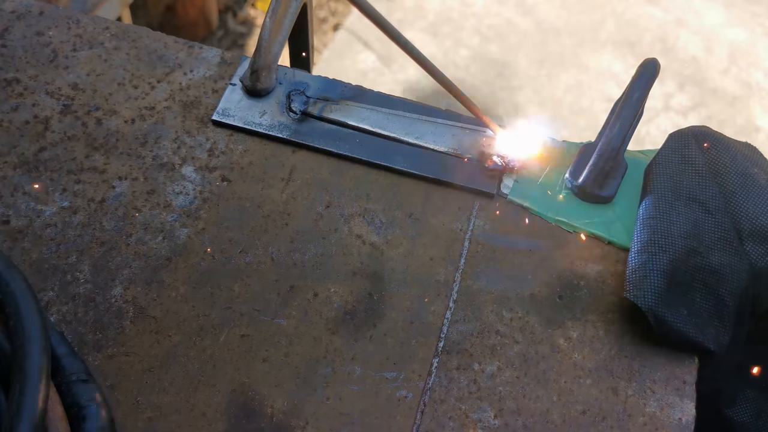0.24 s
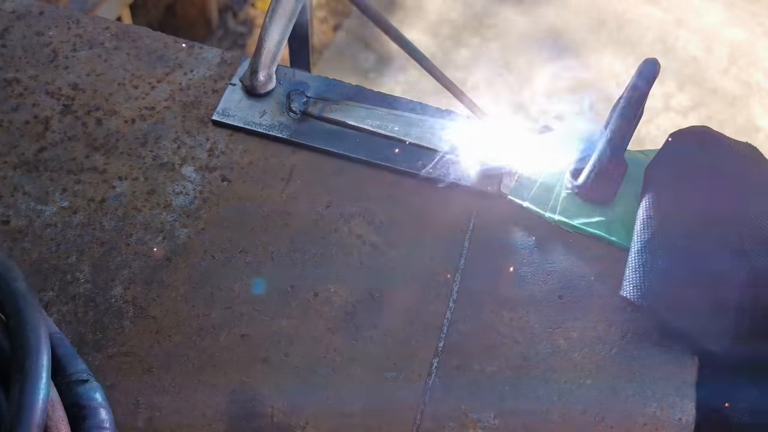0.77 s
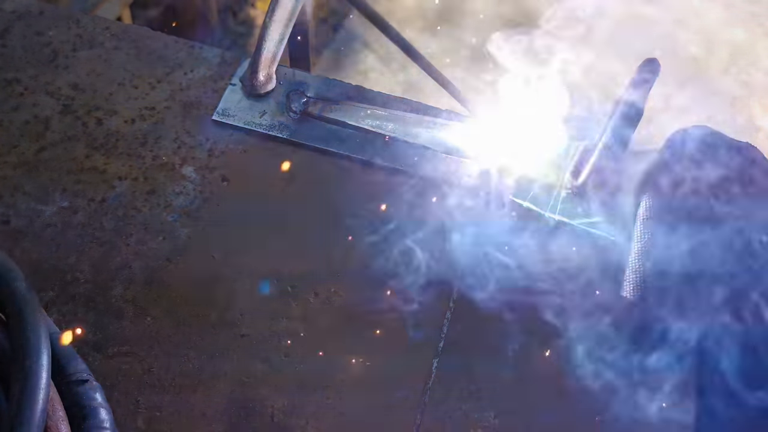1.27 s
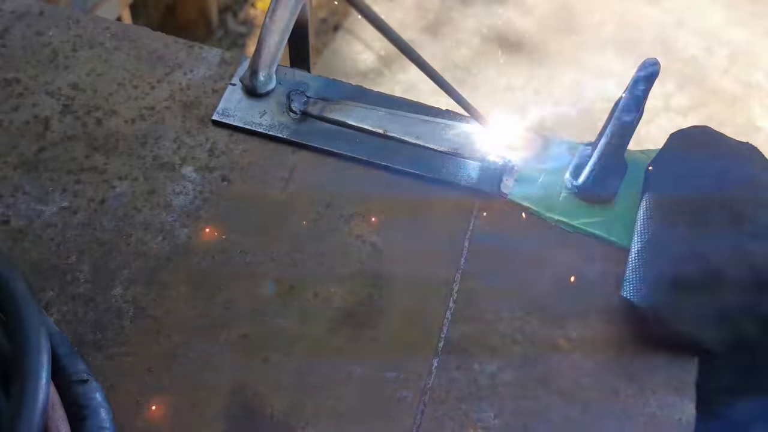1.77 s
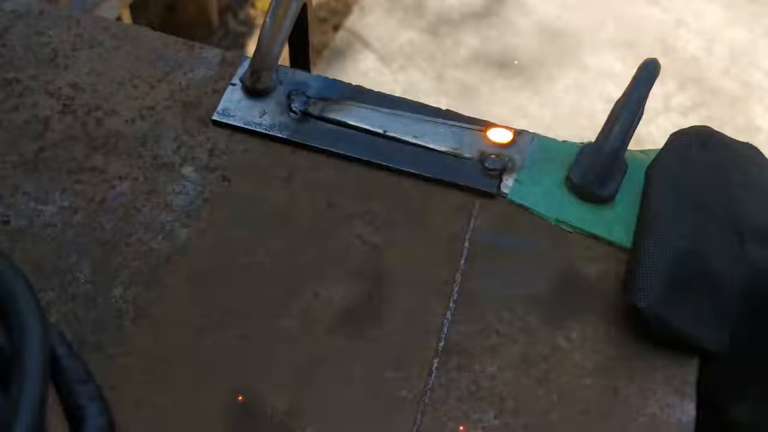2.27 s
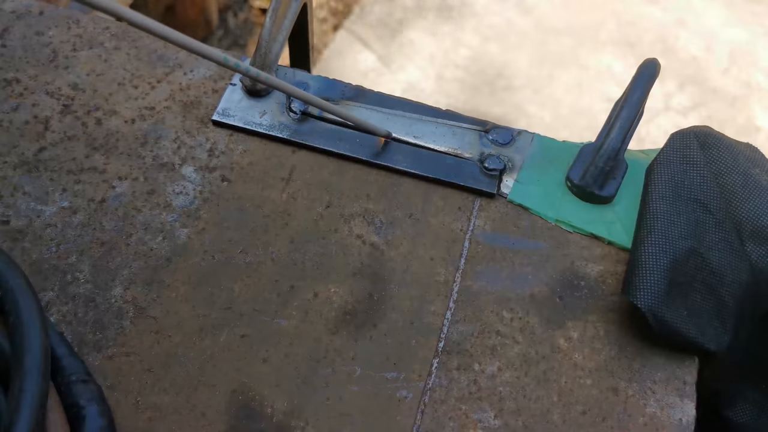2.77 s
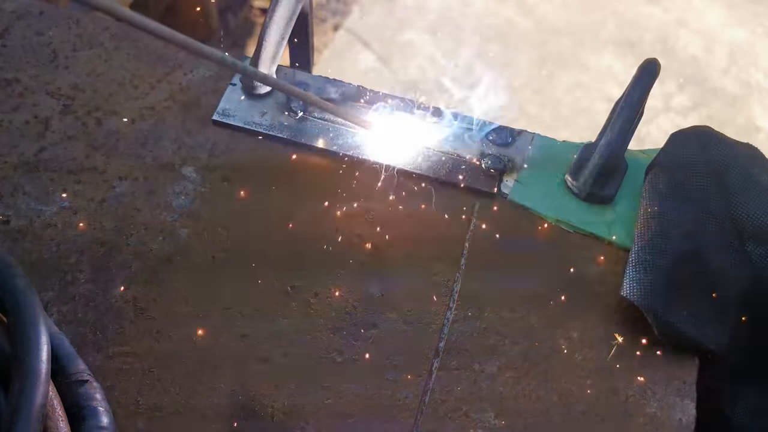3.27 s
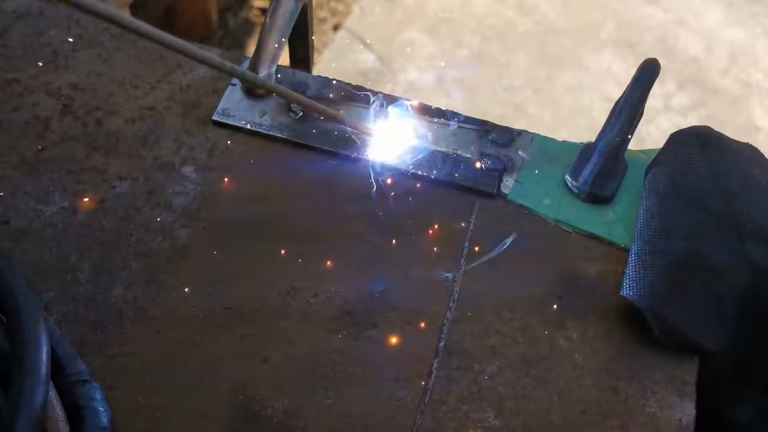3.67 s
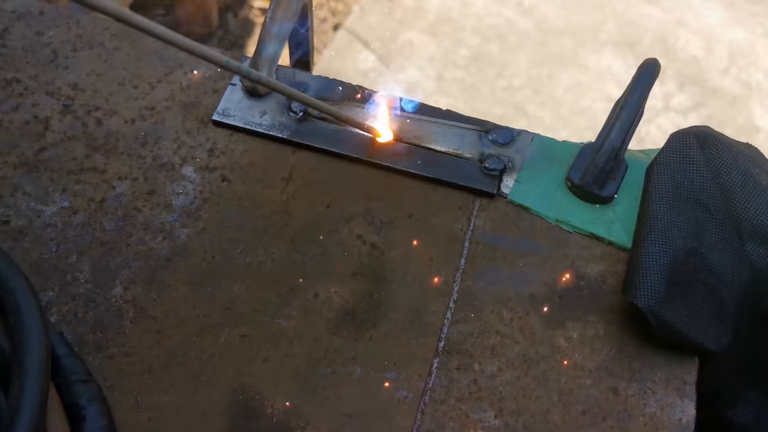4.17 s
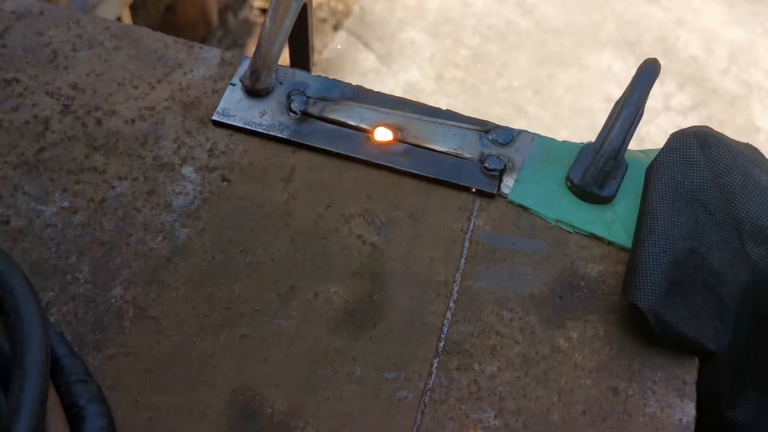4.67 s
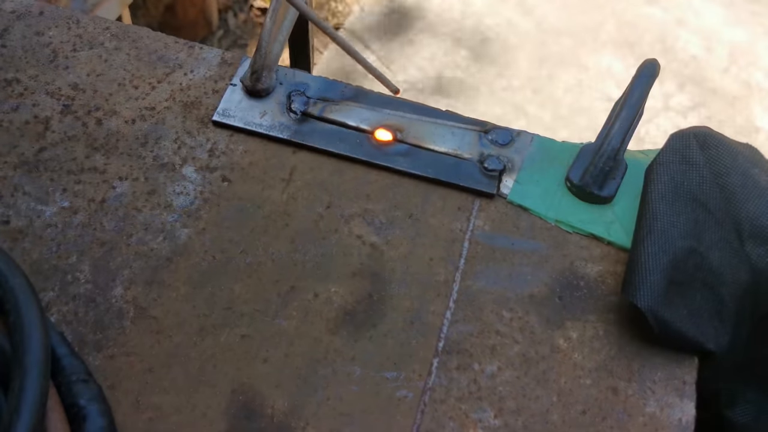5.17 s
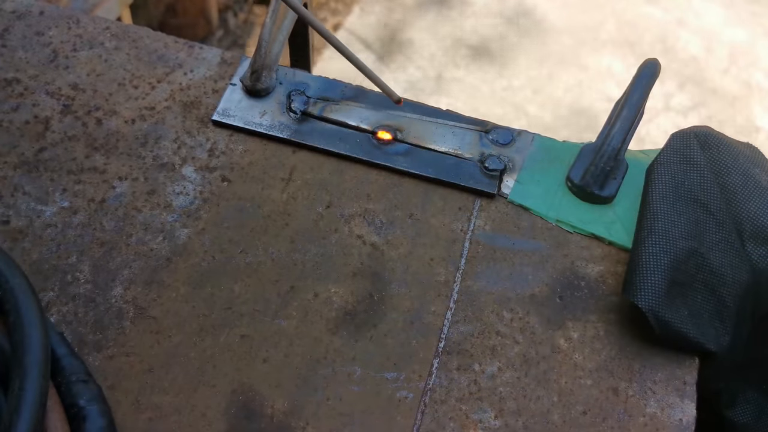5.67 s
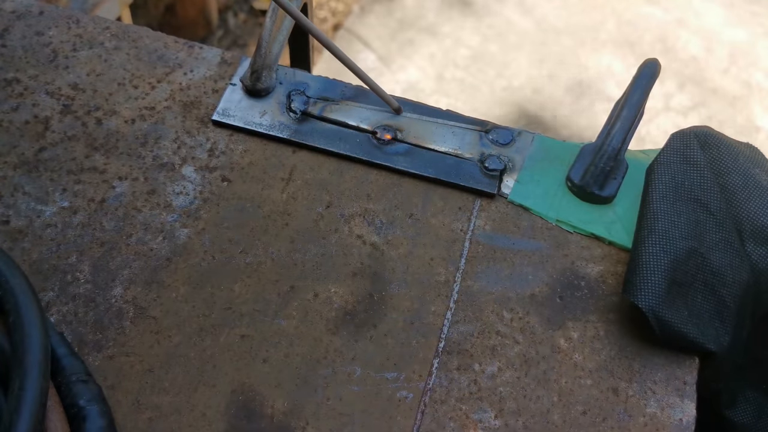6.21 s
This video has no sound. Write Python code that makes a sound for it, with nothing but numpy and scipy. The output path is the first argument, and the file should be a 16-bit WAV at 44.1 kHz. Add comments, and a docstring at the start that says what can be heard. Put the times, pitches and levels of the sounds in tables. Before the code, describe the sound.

Close stick welding hisses, crackles and pops in two bursts over a thin wavering fan whine, then stops, leaving fan and light wind buffeting.

```python
"""Two short stick welds on a clamped steel strip, heard close by: the arc hisses, sizzles and pops.
The arc is noise mixed with tiny bursts, cracks and a jet roar, all sent through shared resonances.
A brief fizz of the first bead and dull puffs of hot gas are shaped noise.
The welder's cooling fan whines throughout, made of wavering tones and a rush of noise; a far motor
drones as one low tone over a rumble. Late on, noise and bumps make air buffet the left microphone."""
import sys
import numpy as np
from scipy import signal
from scipy.fft import rfft, irfft, next_fast_len
from scipy.io import wavfile

SR = 44100
rng = np.random.default_rng(int(sys.argv[2]) if len(sys.argv) > 2 else 0)


def generate_wav(sig):
    """Save sig (samples, or channels by samples) to the path in sys.argv[1] as 16-bit PCM at SR."""
    pcm = np.round(np.clip(np.atleast_2d(sig).T, -1, 1) * 32767).astype(np.int16)
    wavfile.write(sys.argv[1], SR, pcm)


N = 284180
TIME = np.arange(N) / SR
SIZE = next_fast_len(N + SR // 4, real=True)   # room for echoes to die away
HZ = np.maximum(np.fft.rfftfreq(SIZE, 1 / SR), 1)
CUTOFF_HZ = 16000

# Table levels are starting points: the functions add small trims and waver.
# Colour tables give only the balance of pitches; balances are left minus right.

# Level of the far motor: time_s, level_db
MOTOR_LEVEL = [(0.0, -83), (1.3, -94), (1.7, -79), (2.45, -71), (2.7, -63), (2.95, -62.5), (3.25, -90),
               (3.92, -73), (4.35, -81), (4.68, -64), (5.2, -59.5), (5.46, -46.5), (5.6, -51.5),
               (5.75, -62), (5.93, -53), (6.05, -56), (6.17, -51), (6.28, -58), (6.44, -74)]
MOTOR_HZ = 90.6

# Gusts on the microphone: time_s, buffeting_db, length_s, flutter_over_buffeting_db
GUSTS = [(5.145, -56, 0.028, -5), (5.304, -52, 0.0091, -9), (5.374, -50, 0.02, -14),
         (5.675, -43, 0.0093, -7), (5.7, -41.5, 0.008, -7.5), (6.025, -52, 0.012, -12),
         (6.37, -42, 0.014, 3), (6.417, -41, 0.016, 1.5)]
# Single eddies that bump the microphone: time_s, peak_db, half_length_s
BUMPS = [(5.147, -46, 0.0023), (5.18, -44, 0.0025), (5.216, -41.5, .007), (5.286, -35, 0.0033),
         (6.02, -45, .004), (6.371, -32, 0.0026), (6.399, -30.5, 0.0028)]
# A light breeze between the gusts
BREEZE_FROM_S, BREEZE_RISE_S, BREEZE_DROP_DB_PER_S = 4.85, 0.22, 4.5
BREEZE_DB, BREEZE_FLUTTER_DB = -58, -13.5

# Loudness of the fan's blade tone: time_s, level_db
WHINE_LEVEL = [(0.0, -59.5), (0.33, -59), (0.41, -70), (0.47, -60.5), (0.53, -52.5), (0.6, -59),
               (0.73, -54.5), (0.87, -69.5), (0.97, -60), (1.03, -52), (1.1, -61), (1.2, -54), (1.39, -51),
               (1.46, -58), (1.52, -53), (1.6, -55), (1.79, -49.5), (1.84, -60), (1.88, -62), (1.95, -56),
               (2.09, -47.5), (2.24, -53), (2.29, -47.5), (2.355, -48), (2.39, -63), (2.5, -48),
               (2.62, -65), (2.76, -47), (2.9, -60), (3.1, -65.5), (3.19, -70.5), (3.5, -67), (3.8, -62.5),
               (3.87, -70.5), (4.02, -54), (4.12, -58), (4.18, -66), (4.3, -59), (4.37, -73), (4.45, -67),
               (4.71, -68), (4.78, -58.5), (4.87, -53), (4.9, -66), (4.93, -49.5), (5.0, -60), (5.09, -51),
               (5.24, -67), (5.33, -53), (5.41, -61), (5.52, -50.5), (5.62, -61), (5.7, -48), (5.87, -47),
               (5.95, -54.5), (6.03, -52), (6.09, -59.5), (6.2, -45), (6.29, -47), (6.37, -63), (6.43, -66)]
# Loudness of the fan's moving air: time_s, level_db
RUSH_LEVEL = [(0.0, -65.5), (1.0, -69), (1.6, -64.5), (2.1, -66.5), (2.3, -62.5), (2.96, -62.5),
              (3.0, -69.5), (3.18, -75), (4.6, -70), (5.0, -62.5), (5.17, -60), (5.28, -61), (6.44, -62)]
# Lesser rotor tones: multiple_of_turning_rate (rounded when used), level_over_rush_db, balance_db
ROTOR_TONES = [(4, -10, 1.5), (8, -6, -6), (12, -9.5, -19), (13, -14.5, -16), (14, -24, 11),
               (16.1, -8.5, -11.5), (18.8, -17, 1), (20, -16, 12), (21, -16, -18), (28, -31, -14)]
# Colour of the moving air: pitch_hz, level_db_per_hz
RUSH_COLOUR = [(40, -9.5), (130, -10), (230, -8), (400, -5), (540, -4), (700, 4.5), (860, -3), (1080, -9.5),
               (1500, -5), (1680, -18), (1950, -13.5), (2230, -13), (2850, -12.5), (3300, -17),
               (4600, -18.5), (7200, -25), (9000, -33), (16000, -41)]
# Left-right balance of the moving air: pitch_hz, balance_db
RUSH_BALANCE = [(60, -1.5), (250, 0), (520, -6.5), (850, -1), (1200, -3), (1900, -4.5), (2500, -5),
                (3500, 1.5), (8000, -5), (14000, -32)]
# How alike the air sounds on both sides: pitch_hz, likeness (0 to 1, no unit)
RUSH_LIKENESS = [(60, 1), (300, 1), (640, 0.36), (1400, 0.029), (3000, 0.059), (15000, 0.037)]
# Resonances of the welder's case: pitch_hz, width_hz, lift_db
CASE_RESONANCES = [(1810, 125, 10), (2440, 250, 5.5), (4620, 310, 6), (7000, 560, 5)]
BLADES, BLADE_HZ = 7, 672.5   # BLADE_HZ: average number of blades passing per second

# Puffs of hot gas as the arc flares or breaks: time_s, level_db, length_s
PUFFS = [(0.346, -57, 0.013), (1.022, -59, 0.013), (1.428, -63, 0.013), (2.211, -55, 0.01),
         (2.9797, -45, 0.0013), (3.103, -68.5, 0.024), (3.557, -66, 0.01), (4.657, -53, 0.0046)]
# Colour of the puffs: pitch_hz, level_db_per_hz
PUFF_COLOUR = [(40, -17), (140, 2.5), (300, -6), (600, 1), (1500, -15), (4000, -48), (12000, -46)]

# The arc burns harder and softer with the length of its gap: time_s, hiss_db, jet_over_hiss_db
FIRST_ARC = [(0.0, -48.5, -9), (0.14, -48, -19), (0.18, -51, -16.5), (0.31, -52.5, -4.5), (0.35, -49.5, -7),
             (0.43, -54.5, -13), (0.54, -50, -11.5), (0.58, -57.5, -0.5), (0.65, -49.5, -13.5),
             (0.87, -52.5, -10.5), (0.96, -48, -9.5), (1.04, -46, -12.5), (1.08, -51.5, -7.5),
             (1.15, -50.5, -10.5), (1.36, -44.5, -12.5), (1.42, -46, -10), (1.44, -41.5, -11),
             (1.51, -40.5, -15.5), (1.53, -46.5, -26), (1.62, -47.5, -16.5), (1.82, -41, -10.5),
             (1.89, -42, -11.5), (1.96, -45.5, -12), (2.07, -43.5, -14), (2.12, -46, -13), (2.16, -40, -13),
             (2.19, -46, -8)]
SECOND_ARC = [(2.99, -49.5, -11.5), (3.04, -50.5, -9), (3.1, -44, -8), (3.135, -46.5, -13),
              (3.155, -55, -12), (3.186, -51, -11.5), (3.2, -56, -16), (3.25, -57.5, -9), (3.275, -54, -8),
              (3.32, -54.5, -11), (3.345, -55.5, -9), (3.397, -51, -11), (3.415, -57.5, -8),
              (3.49, -57, -10.5), (3.56, -48, -7), (3.62, -51.5, -10), (3.69, -50.5, -7),
              (3.81, -53.5, -10), (3.86, -63, -10), (4.07, -53, -3.5), (4.21, -59, -18), (4.27, -69, -3),
              (4.33, -59.5, -12), (4.39, -58.5, -28), (4.42, -63.5, -9), (4.47, -56, -12),
              (4.6, -59.5, -11), (4.65, -49.5, -7.5)]
# Resonances around the arc, shifting with the rod's place: pitch_hz, width_hz, peak_db
FIRST_RESONANCES = [(2150, 230, -10.5), (2820, 430, -13.0), (4060, 160, -12), (5590, 760, -4.5),
                    (6570, 580, -0.5), (6904, 310, 0.5), (7740, 280, -7), (8770, 780, -10.5),
                    (9950, 280, -9.5), (10430, 340, -14), (11770, 290, -6), (12540, 410, -4),
                    (13300, 810, -8), (14900, 1100, -8)]
SECOND_RESONANCES = [(2237, 260, -7), (2700, 300, -7.0), (3100, 630, -7.5), (4180, 520, -3.5),
                     (4870, 310, -1.5), (5370, 360, -2), (6020, 660, -6.5), (7000, 1030, 1),
                     (7500, 430, -5.5), (8740, 330, -7), (9200, 240, -5.5), (10120, 1400, -8.5),
                     (12600, 1600, -8.5), (13440, 150, -13)]
# Broad arc sound between the resonances: pitch_hz, level_db_per_hz
FIRST_HISS = [(100, -24.5), (500, -20.5), (1400, -16.5), (1750, -21.5), (3650, -17.5), (4600, -13),
              (8300, -15.0), (11400, -10.5), (14300, -15), (15700, -19), (16000, -25)]
SECOND_HISS = [(100, -28.5), (500, -18.5), (1400, -16.5), (1750, -18), (3550, -23.5), (4500, -16),
               (8200, -11.5), (10700, -19.5), (11200, -12), (14000, -11.5), (16000, -14.5)]
# Left-right balance of the arc: pitch_hz, balance_db
ARC_BALANCE = [(200, -1), (1000, -4), (2100, -2), (2750, -8), (3600, -1), (5500, -4), (7000, -6),
               (8000, 6.5), (10000, -4), (15000, -5)]
# Loudest pops, as the arc bursts back after a big drop shorts it:
# time_s, strength_db, treble_over_body_db, crack_length_s, hiss_dip_before_db (above 0 means no dip)
BIG_POPS = [(0.0455, -20, -2, 0.00088, 1), (0.1048, -29, 4, 0.00059, -4), (0.1194, -27, 2, 0.0005, -3),
            (0.1373, -29, 0, 0.0005, -3), (0.1584, -21, 5, 0.0005, -3), (0.16, -22, 1, 0.0006, 0),
            (0.1634, -29, -4, 0.00094, 0), (0.1888, -19.5, -11, 0.00047, -12), (0.2595, -25, 4, 0.00076, 4),
            (0.2988, -29, 0, 0.0004, -3), (0.3262, -29, 0, 0.0006, -5), (0.3341, -27, -6, 0.00094, 0),
            (0.359, -25, 2, 0.00042, 2), (0.3705, -24, 1, 0.00051, -12), (0.4021, -21.5, 3, 0.00078, -2),
            (0.5294, -27, -9, 0.00102, 1), (0.5457, -23, 5, 0.00059, -5), (0.6049, -22.5, 0, 0.00051, 0),
            (0.6247, -26, -6, 0.00076, 2), (0.6603, -19, -2, 0.00059, -3), (0.6698, -23, -3, 0.00068, 1),
            (0.6956, -24, 3, 0.00076, 0), (0.743, -28.5, 9, 0.00034, -6), (0.7734, -28, 0, 0.0005, 0),
            (0.7938, -23.5, 7, 0.00051, -6), (0.8349, -18.5, 4, 0.00072, -2), (0.8845, -30, 0, 0.0004, -2),
            (0.913, -24, -4, 0.00034, -1), (0.9531, -23, -8, 0.00051, 3.5),
            (1.0447, -16, -12, 0.00059, 0.5), (1.0639, -26, 0, 0.0004, 0), (1.1675, -21, -12, 0.00031, 0),
            (1.2122, -22, -11, 0.0011, -2), (1.2348, -21, -4, 0.0005, -9), (1.2385, -27, -2, 0.0005, 0),
            (1.2802, -25, 6, 0.00047, 1.5), (1.2997, -21, -4, 0.0005, -1), (1.3459, -24, -4, 0.0005, -2),
            (1.3791, -22, -4, 0.0005, -2), (1.4061, -19, -12, 0.00025, 0), (1.4078, -16, -14, 0.00068, -5),
            (1.4939, -16, -9, 0.00076, -1), (1.5159, -12, -3, 0.0003, 0), (1.5412, -17, 1, 0.00076, -3),
            (1.5884, -29, 0, 0.0004, -2), (1.5988, -25, 9, 0.00059, 0), (1.6928, -24, 0, 0.0005, -6),
            (1.6986, -26.0, 1, 0.00055, -7), (1.7184, -29, -2, 0.0005, -3), (1.7221, -27, -2, 0.0005, 0),
            (1.7524, -26, 9, 0.00051, -5), (1.7731, -21, 0, 0.0003, -3), (1.8189, -23, -10, 0.0004, 0),
            (1.8616, -25, -5, 0.00092, 0), (1.8663, -23, -3, 0.0005, 0), (1.8965, -22, -5, 0.0005, -3),
            (1.9419, -18, 2, 0.00055, 3.5), (1.9764, -23, -2, 0.0005, -5), (1.9825, -22.5, -1, 0.0012, 3),
            (2.1694, -16, -8, 0.00033, 1), (2.9796, -19.5, 4, 0.0009, -5), (3.1466, -19.5, 2, 0.0007, -4),
            (3.1902, -24.5, 10, 0.0005, 0), (3.2029, -30, 7, 0.00068, -10), (3.2495, -32, 2, 0.00042, 0),
            (3.2814, -30, 0, 0.0005, -1), (3.316, -27, 0, 0.0005, 1), (3.3584, -24, -2, 0.00102, 0),
            (3.3974, -31, 2, 0.0005, 0), (3.4013, -22, 2.5, 0.0005, 0), (3.4627, -35, -2, 0.0005, -2),
            (3.6081, -31, -2, 0.0005, -3), (3.7852, -26, -2, 0.00102, 0), (3.8129, -33, 1, 0.0005, 0),
            (3.8241, -25, -1, 0.00068, 0), (3.9212, -27, 0, 0.00102, 0), (3.959, -33, -3, 0.0005, 3),
            (3.9855, -31, -3, 0.0006, -1), (4.0658, -20, -6, 0.0008, -3), (4.1308, -29, 2, 0.00102, -1),
            (4.1419, -23, -6, 0.00102, 1), (4.158, -29, 0, 0.0007, -4), (4.1712, -27, 5, 0.00094, 2),
            (4.1892, -39, 0, 0.0005, -5), (4.1983, -28, 2, 0.00059, -6), (4.2022, -29.5, 4, 0.00059, 0),
            (4.2483, -36, 1, 0.0004, -4), (4.3218, -35, 0, 0.0004, 0), (4.3363, -31, 1, 0.0004, 0),
            (4.3712, -30, 11.5, 0.00069, -3), (4.3958, -34, 0, 0.0004, -1), (4.4656, -30, 6, 0.00037, 0),
            (4.5505, -33, 4, 0.00025, -3), (4.6116, -26.5, 1, 0.00042, -6), (4.6501, -28.0, -2, 0.00076, 3),
            (4.6568, -32, -1, 0.0011, 2.5)]
# (struck_s, broken_s): the first arc is already burning when the scene opens
FIRST_BURN, SECOND_BURN = (-.1, 2.206), (2.9785, 4.659)
ARC_FADE_S = .006
# Place of the rod: (left_lead_s, balance_shift_db)
FIRST_PLACE, SECOND_PLACE = (.000021, 0.87), (.0001, -1.9)
# Smaller drops cross at random and pop in proportion to the hiss
DROPS_PER_S, DROP_OVER_HISS_DB, DROP_SPREAD_DB, DROP_TREBLE_DB = 45, 13.5, 4, -3
DROP_CRACK_S, DROP_SHORT_S, DROP_HUSH_DB = 0.00037, .004, -3.5

# Colours of the smaller layers: pitch_hz, level_db
STILL_AIR_COLOUR = [(200, -15.0), (2000, -4.0), (4600, 2.0), (7000, 1.5), (9000, -6.5),
                    (12500, -5.5), (14000, -12), (16000, -8.5)]
RUMBLE_COLOUR = [(15, -17), (30, 0.0), (55, 8.0), (90, -4.5), (200, -10.5), (800, -59)]
BUFFET_COLOUR = [(12, -11), (30, 4), (65, 0.5), (110, -7.5), (250, -38), (800, -82)]
FLUTTER_COLOUR = [(60, -34), (125, 2.5), (165, -2.5), (210, -7.5), (300, -12.5), (1200, -63), (4000, -80)]
FIZZ_COLOUR = [(300, -2), (1200, 0), (2000, 3.0), (6500, -4), (9000, -6.0), (16000, -8)]


def from_db(db):
    """Turn decibels into a multiplier."""
    return 10 ** (np.asarray(db) / 20)


def rms_one(x):
    """Scale to an average power of one."""
    return x / np.sqrt(np.mean(x ** 2) + 1e-20)


def in_time(rows):
    """Draw straight lines between table rows, giving each column at every sample."""
    times, *columns = np.transpose(rows)
    return [np.interp(TIME, times, column) for column in columns]


def over_hz(points):
    """Read a pitch table at every frequency, with pitch spaced as the ear hears it."""
    hz, value = np.transpose(points)
    return np.interp(np.log(HZ), np.log(hz), value)


def pan(balance_db):
    """Left and right multipliers for a level difference."""
    gains = from_db(np.array([[.5], [-.5]]) * balance_db)
    return gains / gains.mean(axis=0)


def filtered(x, response):
    """Make each frequency stronger, weaker or later."""
    return irfft(rfft(x, SIZE) * response, SIZE)[..., :N]


def causal(gain):
    """Turn a colour into a filter of unit power that rings only after a blow (minimum phase)."""
    cepstrum = irfft(np.log(rms_one(gain) + 1e-6), SIZE)
    cepstrum[1:SIZE // 2] *= 2
    cepstrum[SIZE // 2 + 1:] = 0
    return np.exp(rfft(cepstrum))


def drift(rate):
    """Smooth random wandering of spread one, changing about rate times a second."""
    return rms_one(filtered(rng.standard_normal(SIZE), 1 / (1 + (HZ / rate) ** 4)))


def stereo_noise(gain, likeness):
    """Coloured noise with partly alike sides; their average has unit power."""
    mid, side = rng.standard_normal((2, SIZE))
    likeness = np.clip(likeness, -.99, .99)
    mid = filtered(mid, gain * np.sqrt(1 + likeness))
    side = filtered(side, gain * np.sqrt(1 - likeness))
    return np.array([mid + side, mid - side]) / np.std(mid)


def still_air(level_db=-72):
    """The faint even hiss of the surroundings and the microphone, as steady noise."""
    return from_db(level_db) * stereo_noise(from_db(over_hz(STILL_AIR_COLOUR)), 0.094)


def drone(tone_db=-2.5, rumble_db=-1, rumble_top_db=-68, wander_hz=0.7, waver_db=2.5):
    """A far motor: one low, unsteady tone over a soft rumble that follows it up to a ceiling."""
    level_db, = in_time(MOTOR_LEVEL)
    pitch_hz = MOTOR_HZ + wander_hz * drift(4.7)
    wave = np.sqrt(2) * np.sin(2 * np.pi * np.cumsum(pitch_hz) / SR)
    tone = wave * from_db(level_db + tone_db + waver_db * drift(8.5))
    rumble = stereo_noise(from_db(over_hz(RUMBLE_COLOUR)), 0.7)
    return tone + rumble * from_db(np.minimum(level_db + rumble_db, rumble_top_db))


def wind(buffet_db=0.0, flutter_db=-2.0, balance_db=16, lumpy_db=3):
    """Eddies, mostly on the left microphone: deep buffeting, higher flutter and single bumps."""
    since = TIME - BREEZE_FROM_S
    breeze_db = BREEZE_DB - BREEZE_DROP_DB_PER_S * since + lumpy_db * drift(8.2)
    deep = from_db(breeze_db) * np.clip(since / BREEZE_RISE_S, 0, 1)
    upper = deep * from_db(BREEZE_FLUTTER_DB)
    for s, db, length, upper_db in GUSTS:
        gust = from_db(db) * np.exp(-.5 * ((TIME - s) / length) ** 2)
        deep = deep + gust
        upper = upper + gust * from_db(upper_db)
    bumps = 0
    for s, db, length in BUMPS:
        passing = ((TIME - s) / length) ** 2   # a push with suction before and after it
        bumps = bumps + from_db(db) * (1 - passing) * np.exp(-.5 * passing)
    buffet = stereo_noise(from_db(over_hz(BUFFET_COLOUR)), 0.08) * deep
    flutter = stereo_noise(from_db(over_hz(FLUTTER_COLOUR)), 0.078) * upper
    return (buffet * from_db(buffet_db) + flutter * from_db(flutter_db) + bumps) * pan(balance_db)


def fan(whine_db=-1, rush_db=5, tones_db=1, waver_db=1.85, jitter=.0015, whine_balance_db=-5.5,
        tone_lag_s=0.00017, air_lag_s=0.000316, scatter=0.25, scatter_hz=22, skirt=0.1, skirt_hz=70):
    """Blade tone, lesser rotor tones and rushing air, all wavering in the turbulent intake."""
    (whine,), (rush,) = in_time(WHINE_LEVEL), in_time(RUSH_LEVEL)
    turns_per_s = BLADE_HZ / BLADES * (1 + jitter * drift(23.0))
    right = np.array([[0], [1]])   # the fan reaches the right side later
    turn = 2 * np.pi * (np.cumsum(turns_per_s) / SR - turns_per_s * tone_lag_s * right)

    # slow eddies make the blade tone swell and fade; small fast ones roughen it
    eddies = 1 + scatter * (drift(scatter_hz) + 1j * drift(scatter_hz))
    eddies = eddies + skirt * (drift(skirt_hz) + 1j * drift(skirt_hz))
    blade_tone = np.imag(eddies * np.exp(1j * BLADES * turn))
    tones = from_db(whine + whine_db + 1.5 * drift(42)) * pan(whine_balance_db) * blade_tone
    for order, db, balance_db in ROTOR_TONES:
        phase = round(order) * turn + rng.uniform(0, 2 * np.pi)
        level = from_db(rush + tones_db + db + waver_db * drift(9.3))
        tones += level * pan(balance_db) * np.sin(phase)

    case_db = sum(db / (1 + (2 * (HZ - hz) / width) ** 2) for hz, width, db in CASE_RESONANCES)
    air = stereo_noise(from_db(over_hz(RUSH_COLOUR) + case_db), over_hz(RUSH_LIKENESS))
    delay = np.exp(-2j * np.pi * HZ * air_lag_s * right)
    air = filtered(air, pan(over_hz(RUSH_BALANCE)) * delay)
    return np.sqrt(2) * tones + air * from_db(rush + rush_db + 1.4 * drift(14.0))


def burning(struck, broken, fade_s):
    """One from the strike on, dying away quickly after the break."""
    return (TIME >= struck) * np.exp(-np.maximum(TIME - broken, 0) / fade_s)


def puffs():
    """Short dull thuds of expanding gas: noise under smooth swells."""
    swell = sum(from_db(db) * np.exp(-.5 * ((TIME - s) / length) ** 2) for s, db, length in PUFFS)
    return swell * rms_one(filtered(rng.standard_normal(N), from_db(over_hz(PUFF_COLOUR))))


def bead_fizz(start=2.0, end=2.362, level_db=-61):
    """The molten bead's fizz, steady noise that starts under the first arc and briefly outlasts it."""
    fizz = rms_one(filtered(rng.standard_normal(N), from_db(over_hz(FIZZ_COLOUR))))
    return from_db(level_db) * burning(start, end, fade_s=0.0038) * fizz


def sizzle(per_s=1100, spread_db=2.0, share=0.29, flutter_db=0.38, flutter_hz=220, likeness=0.38,
           spit_per_s=110, spit_db=17):
    """Tiny bursts of boiling metal and flux, and a few sharper spits, over the fluttering arc's hiss."""
    sizes = from_db(spread_db * np.minimum(rng.exponential(1, N), 3.5)) * rng.choice([-1, 1], N)
    grains = rms_one(sizes * (rng.random(N) < per_s / SR))
    spits = from_db(spit_db) * rng.uniform(0.74, 0.9, N) * (rng.random(N) < spit_per_s / SR)
    # the jet is spread out, so each side hears a partly different hiss
    shared, separate = rng.standard_normal(N), rng.standard_normal((2, N))
    hiss = np.sqrt(likeness) * shared + np.sqrt(1 - likeness) * separate
    mix = np.sqrt(share) * grains + np.sqrt(1 - share) * hiss + spits
    return rms_one(mix * from_db(flutter_db * drift(flutter_hz)))


def pops(curve, burn, short_s=0.01, rise_s=.00005, tail_s=0.0045, tail_db=-18, level_db=-0.3,
         treble_hz=10500, treble_spread_db=2.0, snap_share=.36):
    """A drop bridges the gap, then bursts with a snap and spray: gives cracks and the hiss's dips."""
    cracks, hush = np.zeros(N), np.ones(N)
    age = np.arange(SR // 50) / SR
    chance = rng.random(N)
    size, tone, spray = rng.standard_normal((3, N))
    small_db = in_time(curve)[0] + DROP_OVER_HISS_DB + DROP_SPREAD_DB * np.minimum(size, 1)
    small = [(i / SR, small_db[i], DROP_TREBLE_DB + treble_spread_db * tone[i], DROP_CRACK_S, DROP_HUSH_DB)
             for i in np.flatnonzero(chance < DROPS_PER_S / SR)]
    low, high = (signal.butter(3, treble_hz, kind, fs=SR) for kind in ("low", "high"))
    low_share = 2 * treble_hz / SR   # part of the whole pitch range below treble_hz
    snap = rms_one(signal.unit_impulse(len(age)))
    for drops, hush_s in (small, DROP_SHORT_S), (BIG_POPS, short_s):
        for s, db, treble_db, crack_s, hush_db in drops:
            if not burn[0] - hush_s <= s <= burn[1]:
                continue
            at = round(s * SR)
            fade = np.exp(-age / crack_s) + from_db(tail_db) * np.exp(-age / tail_s)
            burst = spray[at:at + len(age)] * (1 - np.exp(-age / rise_s)) * fade
            burst = np.sqrt(snap_share) * snap + np.sqrt(1 - snap_share) * rms_one(burst)
            body = rms_one(signal.lfilter(*low, burst))
            treble = rms_one(signal.lfilter(*high, burst))
            burst = np.sqrt(low_share) * body + np.sqrt(1 - low_share) * from_db(treble_db) * treble
            # dividing by the root of the length sets the burst's total energy
            cracks[at:at + len(age)] += from_db(db + level_db) * burst / np.sqrt(len(age))
            hush[max(at - int(hush_s * SR), 0):at] = from_db(min(hush_db, 0))
    return cracks, hush


def weld(curve, burn, hiss, resonances, level_db, roar_db, unrest_db, top_db, thinning,
         unrest_hz=22, top_hz=13500):
    """One run of the arc: sizzle, jet roar and cracks all sound through the same resonances."""
    hiss_db, jet_db = in_time(curve)
    cracks, hush = pops(curve, burn)
    power = from_db(over_hz(hiss)) ** 2
    for hz, width, db in resonances:
        power = power + from_db(db) ** 2 / (1 + (2 * (HZ - hz) / width) ** 2) ** 2
    unrest = unrest_db * drift(unrest_hz)   # the pool sloshes under the rod
    source = sizzle() * from_db(hiss_db + level_db + unrest) * hush
    jet = filtered(source, 1 / (1 + (HZ / 4000) ** 6))
    top = filtered(source, 1 / (1 + (top_hz / HZ) ** 10))
    # a weak arc sounds thinner: its top treble is raised
    top_gain_db = top_db + thinning * (hiss_db.max() - hiss_db)
    source = source + jet * (from_db(jet_db + roar_db) - 1) + top * (from_db(top_gain_db) - 1)
    arc = (source + cracks) * burning(*burn, fade_s=ARC_FADE_S)
    return filtered(arc, causal(np.sqrt(power)))


def workshop(x, place, room_db=-14, room_t60=0.054):
    """Place the arc mostly to the right; bench and clamps add only a brief scatter of echoes."""
    lead_s, shift_db = place
    age = TIME[:SR // 4]
    echoes = rng.standard_normal((2, len(age))) * from_db(-60 * age / room_t60)
    echoes *= from_db(room_db) / np.linalg.norm(echoes, axis=1, keepdims=True)
    direct = np.exp(2j * np.pi * HZ * lead_s * np.array([[.5], [-.5]]))
    return filtered(x, (direct + rfft(echoes, SIZE)) * pan(over_hz(ARC_BALANCE) + shift_db))


def scene():
    """Both welds on the bench, with fan, motor and wind around them."""
    first = weld(FIRST_ARC, FIRST_BURN, FIRST_HISS, FIRST_RESONANCES,
                 level_db=-0.64, roar_db=15, unrest_db=1.08, top_db=-4.0, thinning=.03)
    second = weld(SECOND_ARC, SECOND_BURN, SECOND_HISS, SECOND_RESONANCES,
                  level_db=0.0, roar_db=13.0, unrest_db=1.3, top_db=-0.5, thinning=0.53, top_hz=12300)
    bench = workshop(first + bead_fizz() + puffs(), FIRST_PLACE) + workshop(second, SECOND_PLACE)
    return still_air() + drone() + wind() + fan() + bench


def record(dry):
    """Cut the top of the treble steeply."""
    return signal.sosfilt(signal.ellip(12, .1, 80, CUTOFF_HZ, fs=SR, output="sos"), dry)


dry = scene()
out = record(dry)
generate_wav(out)
```